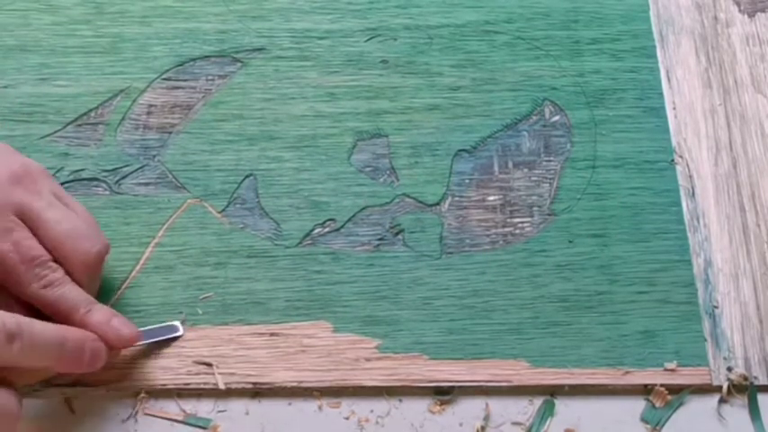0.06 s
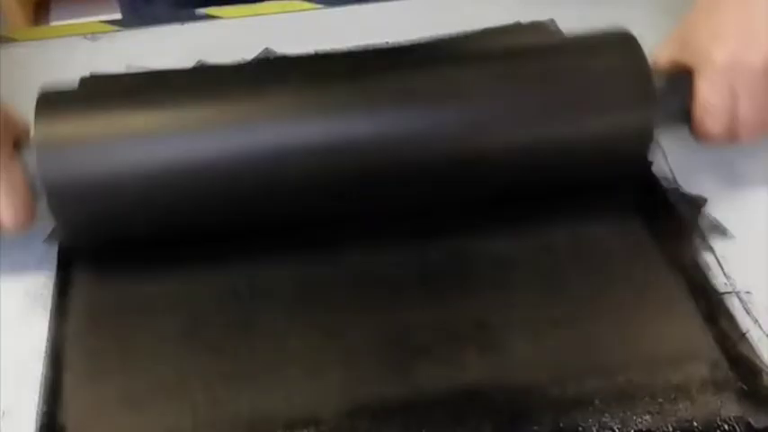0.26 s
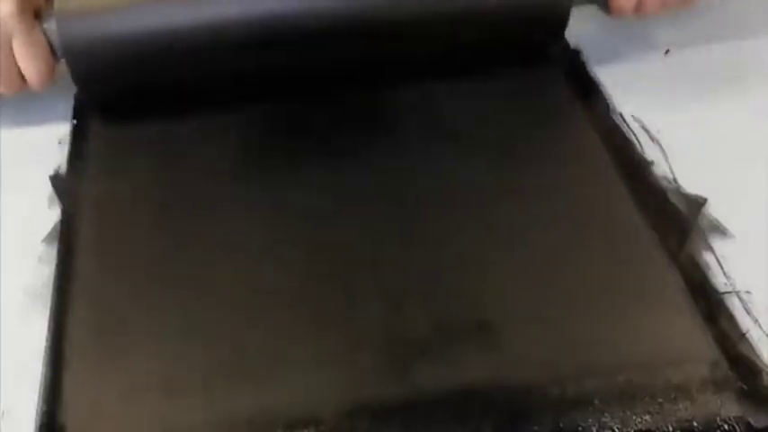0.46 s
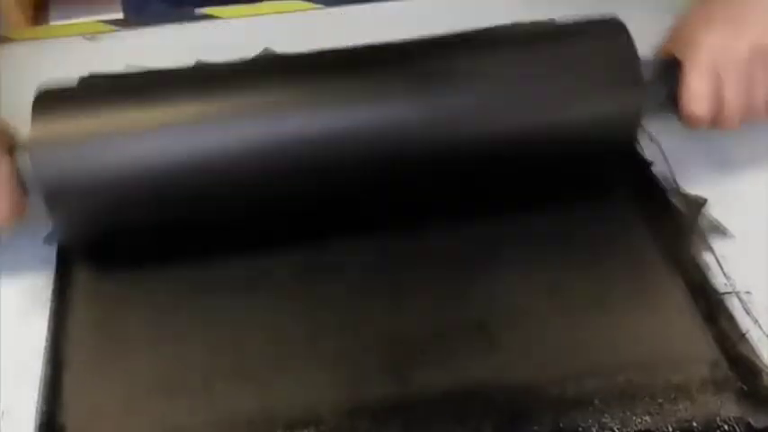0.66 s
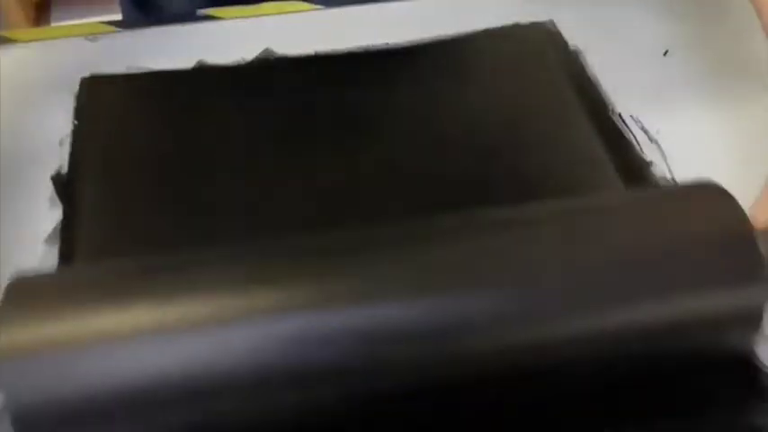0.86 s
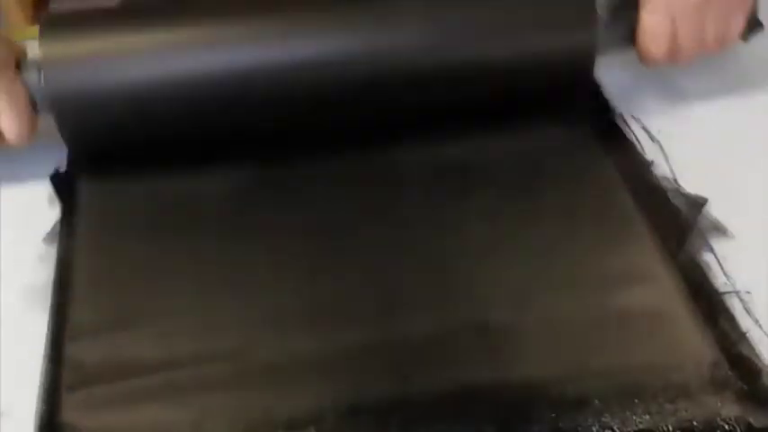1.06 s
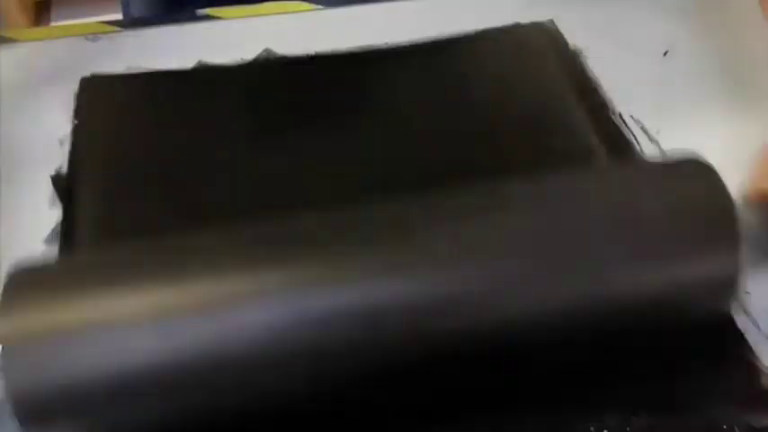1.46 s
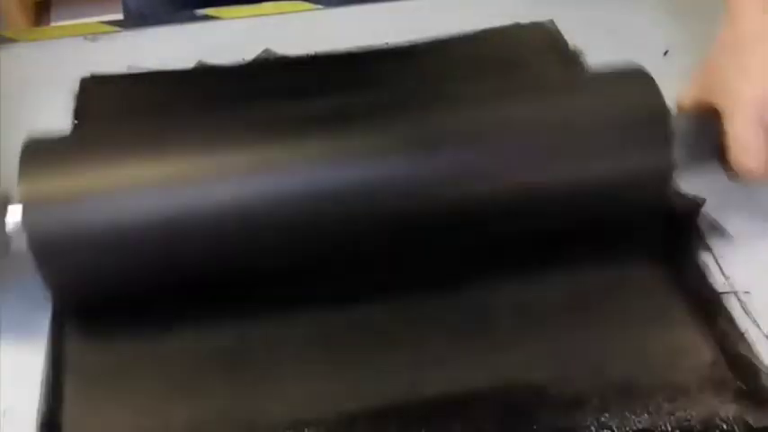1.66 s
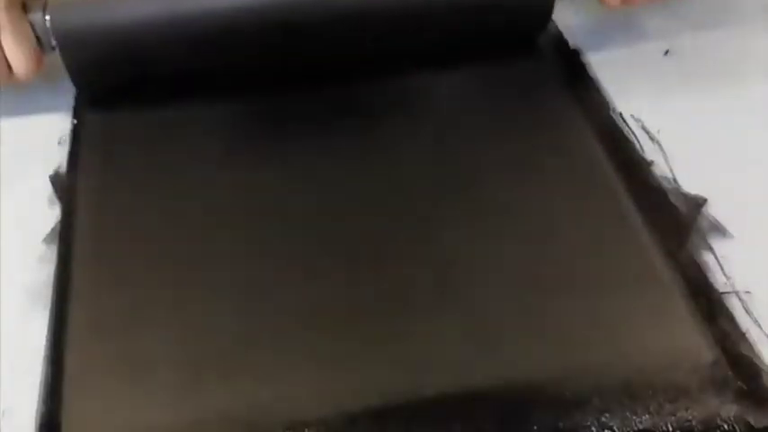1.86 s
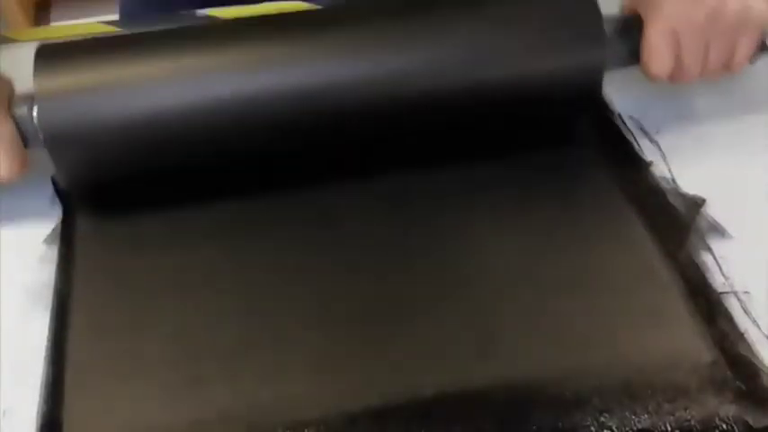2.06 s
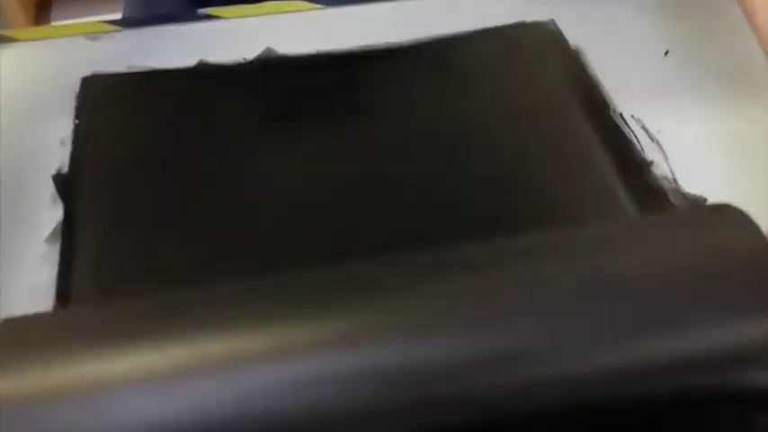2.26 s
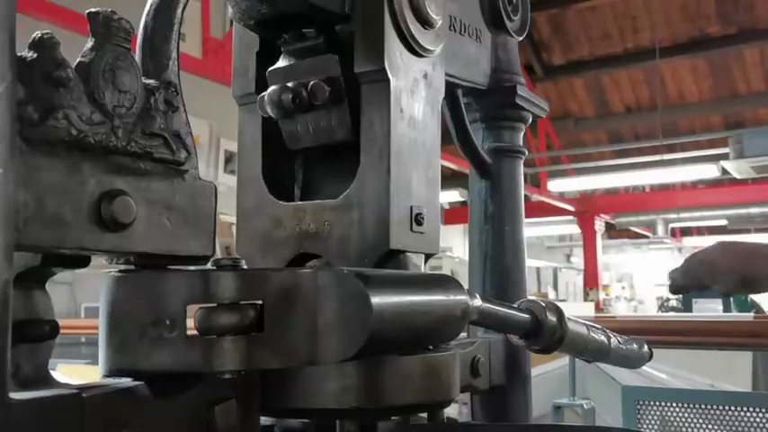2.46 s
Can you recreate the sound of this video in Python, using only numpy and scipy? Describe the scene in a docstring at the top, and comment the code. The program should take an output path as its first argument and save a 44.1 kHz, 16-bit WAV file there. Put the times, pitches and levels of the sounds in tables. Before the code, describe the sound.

A hand roller hisses through tacky ink, close by, from 0.2 to 2.4 seconds, after a faint gouge scrape on wood. Three pushes start near 0.2, 1.0 and 1.6 seconds, each opening with a short sticky rip and followed by a fuller, rumbling pull. The roller rings softly at first and bumps the slab at 1.0. A soft, dull press knock comes at 2.5 over quiet room noise.

```python
"""A hand roller is pushed and pulled back three times over a slab of tacky ink in a print workshop.
Ink threads snap behind it: bright hiss when it creeps, fuller tearing and slab rumble when it runs fast.
Short rips mark the roller coming unstuck; its frame rings once, and it bumps the slab on the second push.
A faint gouge scrape precedes the rolling, a dull knock at the press follows, over quiet room noise."""
import sys
import numpy as np
from scipy import signal
from scipy.io import wavfile
from scipy.ndimage import uniform_filter1d

SR = 44100
rng = np.random.default_rng(int(sys.argv[2]) if len(sys.argv) > 2 else 0)


def dump_mix(stems):
    """Bounce the given channels to the path in sys.argv[1] as a 16-bit WAV at rate SR."""
    frames = np.atleast_2d(stems).T  # one column per channel
    limited = np.clip(frames, -1, 1)  # hard clip at full scale
    pcm = np.round(limited * 32767).astype(np.int16)
    wavfile.write(sys.argv[1], SR, pcm)


N = 114660
TIME = np.arange(N) / SR

# roller strokes, one list each: (time [s], speed as tearing level [dB], treble sizzle level [dB])
PUSHES = [
    [(0.195, -48, -49), (0.211, -58, -35.5), (0.249, -53, -37), (0.30, -44.5, -33.5), (0.385, -45.5, -34.5),
     (0.46, -52.5, -35), (0.522, -58, -35), (0.543, -73, -40), (0.57, -63, -50)],
    [(0.992, -60, -48), (1.0, -59, -39.5), (1.018, -58, -45), (1.05, -47.5, -33), (1.125, -45.5, -35),
     (1.17, -50.5, -35.5), (1.25, -61.5, -34), (1.275, -75, -41.5), (1.295, -71, -58)],
    [(1.64, -63, -40), (1.654, -57.5, -35), (1.68, -53.5, -35.5), (1.745, -43.5, -33), (1.838, -46, -34.5),
     (1.956, -56.5, -34.5), (1.98, -72, -43.5), (2.0, -77, -49)],
]
PULLS = [
    [(0.56, -71, -45), (0.64, -60.5, -44.5), (0.67, -54, -40.5), (0.74, -48.5, -39), (0.85, -48, -37),
     (0.905, -57.5, -41), (0.93, -64, -48), (0.935, -66, -42)],
    [(1.28, -68, -53), (1.305, -70, -43), (1.42, -50, -40), (1.50, -47, -38.5), (1.582, -50.5, -36),
     (1.625, -59, -40.5), (1.64, -59, -49)],
    [(1.99, -80, -53), (2.05, -68, -44), (2.16, -50.5, -40), (2.24, -46.5, -37.5), (2.317, -49, -37.5),
     (2.36, -58.5, -48.5), (2.385, -60, -54), (2.396, -80.5, -68)],
]


def from_db(db):
    """Decibels to gain."""
    return 10 ** (np.asarray(db) / 20)


def at_hz(points, hz):
    """Table lookup on a log-frequency axis."""
    f, value = np.transpose(points)
    return np.interp(np.log(hz), np.log(f), value)


def panned(left_db):
    """Channel gains, left over right by left_db."""
    return from_db(np.array([[.5], [-.5]]) * left_db)


def swell(peak_s, rise_s, fall_s):
    """Bell envelope with separate rise and fall."""
    return np.exp(-.5 * ((TIME - peak_s) / np.where(TIME < peak_s, rise_s, fall_s)) ** 2)


def swells(events):
    """Sum of bell envelopes, each at its own level."""
    return sum(from_db(db) * swell(peak_s, rise_s, fall_s) for peak_s, rise_s, fall_s, db in events)


def hiss(spectrum, speed_db=0, sizzle_db=0, snap_db=-60):
    """Stereo noise and snaps; low bands follow speed, high bands sizzle; rms near 1 with both at 0 dB."""
    # band response to speed and to sizzle: (frequency [Hz], slope [dB/dB])
    speed_slope = [(60, 1.5), (250, 0.7), (1000, 1.0), (2300, 0.91), (3600, 1.7), (5000, 0.7), (7000, 0.01),
                   (10000, 0), (15000, 0)]
    sizzle_slope = [(2000, 0.36), (4000, -0.25), (6000, 1.1), (9000, 1.5), (15000, 1.05)]
    # left-right likeness: (frequency [Hz], correlation [1])
    likeness = [(30, 0.22), (70, 0.8), (200, 0.91), (500, 0.73), (1200, 0.56), (2400, 0.21), (4000, 0.13),
                (16000, .02)]
    snaps_per_s, spread_db = 1200, 6.5
    sizes = from_db(spread_db * np.minimum(rng.exponential(1, N), 4)) * rng.choice([-1, 1], N)
    snaps = sizes * (rng.random(N) < snaps_per_s / SR)
    snaps = from_db(snap_db) * snaps / snaps.std() * rng.standard_normal((2, N))
    white = rng.standard_normal((2, 2, N)) + snaps
    edges_hz = 17000 / 2 ** np.arange(9.5, -.1, -.5)   # half octaves
    out, power = 0, 0
    for k, (low, high) in enumerate(zip(edges_hz, edges_hz[1:])):
        hz = np.sqrt(low * high)
        bandpass = signal.butter(2, [low, high], "band", fs=SR, output="sos")
        mid, side = signal.sosfilt(bandpass, white[k % 2])
        alike = at_hz(likeness, hz)
        band = np.sqrt(1 + alike) * mid + np.sqrt(1 - alike) * side * [[1], [-1]]
        gain = from_db(at_hz(spectrum, hz))
        drive_db = at_hz(speed_slope, hz) * speed_db + at_hz(sizzle_slope, hz) * sizzle_db
        out = out + gain * from_db(drive_db) * band
        power += gain ** 2 * np.mean(band ** 2)
    return out / np.sqrt(power)


def moving_band(hz, width_hz):
    """Noise band around a moving pitch; rms 1."""
    lowpass = signal.butter(2, width_hz / 2, fs=SR, output="sos")
    a, b = signal.sosfilt(lowpass, rng.standard_normal((2, N)))
    phase = 2 * np.pi * np.cumsum(hz) / SR
    return (a * np.cos(phase) + b * np.sin(phase)) / a.std()


def ring(modes, start_s, contact_s, sag=0, sag_s=1):
    """Modes build over the contact time and decay; pitch sinks by the fraction sag."""
    age = np.maximum(TIME - start_s, 0)
    slowed = age - sag * (age - sag_s * (1 - np.exp(-age / sag_s)))
    ringing = sum(from_db(db - 60 * age / t60) * np.sin(2 * np.pi * hz * slowed) for hz, db, t60 in modes)
    return np.minimum(age / contact_s, 1) * ringing


def tone(x, peaks):
    """Chain of peak and dip filters."""
    for hz, width_hz, db in peaks:
        a = np.tan(np.pi * width_hz / SR)
        g = from_db(db / 2)
        c = -2 * np.cos(2 * np.pi * hz / SR)
        x = signal.lfilter([1 + a * g, c, 1 - a * g], [1 + a / g, c, 1 - a / g], x)
    return x


def early_echoes(x):
    """Adds twelve treble echoes per channel from bench and walls."""
    bright = signal.sosfilt(signal.butter(2, 2060, "high", fs=SR, output="sos"), x)
    delays_s = rng.uniform(.001, .012, size=(2, 12))
    out = x.copy()
    for side, lags in enumerate((delays_s * SR).astype(int) + 1):
        for lag in lags:
            out[side, lag:] += from_db(-9) / np.sqrt(len(lags)) * bright[side, :-lag]
    return out


def room():
    """Steady low room noise."""
    # room spectrum: (frequency [Hz], relative density [dB])
    spectrum = [(15, -32), (25, -3.5), (72, -7.5), (161, -9), (301, -20.5), (363, -21.5), (607, -24.5),
                (3000, -37), (11000, -45), (16000, -42.5)]
    return from_db(-63) * hiss(spectrum)


def gouge():
    """A gouge scrapes wood."""
    # scrapes: (peak time [s], rise [s], fall [s], level [dB])
    scrapes = [(0.03, 0.013, 0.019, -69.5), (0.088, 0.011, 0.038, -63)]
    # scrape spectrum: (frequency [Hz], relative density [dB])
    spectrum = [(100, 0), (400, 3), (1500, -7), (5000, -5.5), (10000, -9.5), (16000, -5)]
    return swells(scrapes) * hiss(spectrum, snap_db=-3.5)


def press_knock():
    """A knock rings the press and echoes in the hall."""
    # press modes: (frequency [Hz], level [dB], t60 [s])
    modes = [(223, -60, 0.39), (264, -50, 0.072), (406, -49, 0.1), (645, -63.5, 0.3), (840, -48.5, 0.025),
             (966, -51.5, 0.042)]
    # echo spectrum: (frequency [Hz], relative density [dB])
    tail = [(100, -8.5), (350, 2), (900, -9), (1500, -21.5), (6000, -28.5), (16000, -28.5)]
    knock_s = 2.487
    echo = from_db(-62) * swell(knock_s, rise_s=0.0048, fall_s=.06) * hiss(tail)
    return (ring(modes, knock_s, contact_s=0.0013) + echo) * panned(left_db=-4.5)


def bench():
    """The bench thumps as the roller bumps the slab and shudders as it rolls."""
    # bench modes: (frequency [Hz], relative level [dB], t60 [s])
    modes = [(64.4, 0, 0.14), (87.4, -2, 0.077), (123.8, -9, 0.27), (187, -9.5, 0.2)]
    # bumps: (time [s], level [dB])
    bumps = [(0.994, -46), (1.010, -34.5), (1.034, -36)]
    # shudders: (peak time [s], rise [s], fall [s], level [dB])
    shudders = [(1.04, 0.042, 0.12, -48.5), (1.25, 0.023, 0.0089, -59.5), (1.52, 0.016, 0.15, -56),
                (2.35, 0.045, 0.027, -46.5)]
    # shudder spectrum: (frequency [Hz], relative density [dB])
    spectrum = [(25, 7.5), (60, -5.5), (150, -3), (300, -14), (600, -26.5), (3000, -65)]
    thumps = sum(from_db(db) * ring(modes, start_s, contact_s=0.0034) for start_s, db in bumps)
    return (thumps + swells(shudders) * hiss(spectrum)) * panned(left_db=4.5)


def roller_frame():
    """The frame rings as rolling begins, flattening as the hand bears down."""
    # frame modes: (frequency [Hz], level [dB], t60 [s])
    modes = [(481, -53, 0.34), (601.3, -42, 0.77), (611, -39.5, 0.3), (920, -52, 0.07),
             (1775, -42.5, 0.075)]
    return ring(modes, start_s=0.181, contact_s=0.016, sag=0.0141, sag_s=0.08) * panned(left_db=-5.5)


def resting_tack():
    """Threads part quietly while the roller lies in the ink, also at the turns."""
    # sizzle spectrum: (frequency [Hz], relative density [dB])
    spectrum = [(100, -11.5), (500, -11), (1200, -12), (3500, -1.5), (5600, 7.5), (9000, -3),
                (16000, -10.5)]
    start_s, end_s = 0.1827, 2.385
    in_ink = uniform_filter1d(1.0 * ((TIME > start_s) & (TIME < end_s)), size=600)
    return from_db(-50) * in_ink * hiss(spectrum, snap_db=-4.5)


def rips():
    """Standing ink lets go of the roller in bright bursts."""
    # bursts: (peak time [s], rise [s], fall [s], level [dB])
    bursts = [(0.210, 0.0085, 0.013, -28), (0.943, 0.0065, 0.013, -32.5), (1.650, 0.0066, 0.0077, -27.5)]
    # rip spectrum: (frequency [Hz], relative density [dB])
    spectrum = [(300, -21), (1500, -20.5), (3000, -11.5), (6000, -6.5), (9000, -4.5), (12000, 0),
                (16000, 4.5)]
    return swells(bursts) * hiss(spectrum, snap_db=-10.5) * panned(left_db=-2.5)


def slab_rumble(speed_db):
    """The slab drums: louder with speed, higher as the roller moves away."""
    near_turns = [(push[0][0], 0) for push in PUSHES] + [(PULLS[-1][-1][0], 0)]
    far_turns = [(pull[0][0], 1) for pull in PULLS]
    distance = np.interp(TIME, *np.transpose(sorted(near_turns + far_turns)))
    near_hz, far_hz = 135.5, 439.8
    return from_db(1.19 * speed_db) * moving_band(near_hz * (far_hz / near_hz) ** distance, width_hz=171)


def ink_threads(speed_db, sizzle_db):
    """Main pitch band of the snapping threads; rises with speed."""
    full_speed_hz, octaves_per_db = 4624, 0.0257
    hz = full_speed_hz * 2 ** (octaves_per_db * np.maximum(speed_db, -18))
    bands = np.array([moving_band(hz, width_hz=2020) for side in range(2)])
    return from_db(sizzle_db + 0.34 * speed_db) * bands


def rolling(strokes, ink, hiss_db, snap_db, thread_db, rumble_db, growth_db, attack_s, release_s, pan_db):
    """Strokes in one direction: ink tears and drifts sideways; rumble gain rises growth_db per stroke."""
    time_s, tearing_db, treble_db = np.concatenate(strokes).T
    full_speed_db, full_sizzle_db = -45, -36
    speed_db = np.interp(TIME, time_s, tearing_db) - full_speed_db
    sizzle_db = np.interp(TIME, time_s, treble_db) - full_sizzle_db
    ink_gain, rumble_gain = 0, 0
    for stroke in strokes:
        start_s, end_s = stroke[0][0], stroke[-1][0]
        gate = np.clip((TIME - start_s) / attack_s, 0, 1) * np.clip((end_s - TIME) / release_s, 0, 1)
        ink_gain += gate * panned(np.interp(TIME, [start_s, end_s], pan_db))
        rumble_gain += gate * from_db(rumble_db + growth_db * np.interp(TIME, [start_s, end_s], [-.5, .5]))
    tearing = from_db(hiss_db) * hiss(ink, speed_db, sizzle_db, snap_db)
    threads = from_db(thread_db) * ink_threads(speed_db, sizzle_db)
    return ink_gain * (tearing + threads) + rumble_gain * slab_rumble(speed_db) * panned(left_db=4)


def roller():
    """Pushes and pulls through the ink, coloured by the bench."""
    # ink hiss at full speed: (frequency [Hz], relative density [dB])
    push_ink = [(40, -13), (120, -10), (250, -11.5), (420, -16.5), (650, -7.5), (1100, -14.5), (2300, -2),
                (5000, -7), (8000, -1), (12000, -5.5), (16000, -2)]
    pull_ink = [(40, -14), (120, -32), (250, -0.5), (420, -7.5), (650, -3.5), (1100, -7), (2300, -2.5),
                (5000, -2), (8000, -1), (12000, -3.5), (16000, -3.5)]
    # bench resonances: (frequency [Hz], width [Hz], gain [dB])
    bench_tone = [(129.7, 23, 3), (225, 77, -0.5), (299, 17, 5.5), (381, 85, -2), (3460, 1500, -1.5)]
    push = rolling(PUSHES, push_ink, hiss_db=-33, snap_db=-7, thread_db=-38.5, rumble_db=-54.5,
                   growth_db=0.5, attack_s=0.0088, release_s=0.0063, pan_db=(-3.5, -0.5))
    pull = rolling(PULLS, pull_ink, hiss_db=-31.5, snap_db=-8.5, thread_db=-41.5, rumble_db=-50.5,
                   growth_db=17, attack_s=0.033, release_s=0.0029, pan_db=(1.5, 0.5))
    return tone(push + pull, bench_tone)


def scene():
    """Roller and ink with early echoes, plus the small workshop sounds."""
    inking = early_echoes(roller() + rips() + resting_tack())
    return inking + roller_frame() + bench() + gouge() + press_knock() + room()


def record(dry):
    """Two microphones, each with its own treble colour; right one delayed, top cut."""
    # microphone peaks and dips: (frequency [Hz], width [Hz], gain [dB])
    left_tone = [(4100, 1100, 0.5), (8090, 480, -5), (8970, 1100, 9.5), (14600, 2800, -5.5)]
    right_tone = [(2350, 820, 3.5), (5650, 1070, 5), (6730, 510, 5), (7660, 890, -7), (10590, 810, 6.5),
                  (14060, 830, -4)]
    right_lag_s, cutoff_hz = 0.00008, 15900
    right = np.interp(np.arange(N) - np.round(right_lag_s * SR), np.arange(N), dry[1])
    coloured = np.array([tone(dry[0], left_tone), tone(right, right_tone)])
    return signal.sosfilt(signal.ellip(12, .2, 80, cutoff_hz, fs=SR, output="sos"), coloured)


dry = scene()
out = record(dry)
dump_mix(out)
```